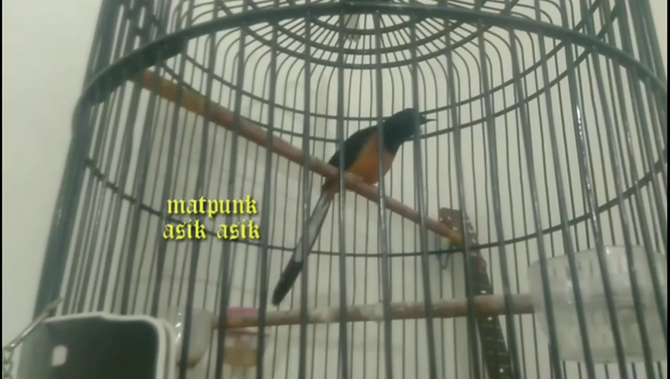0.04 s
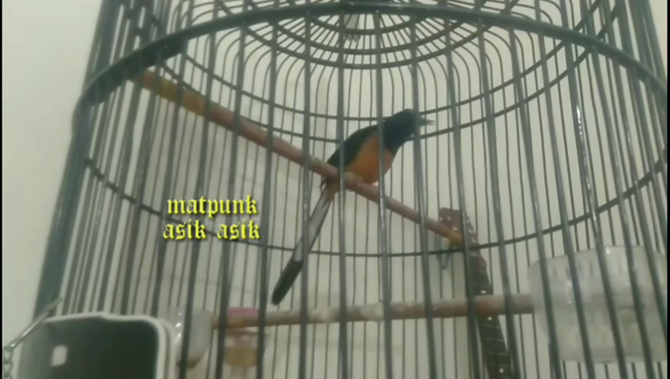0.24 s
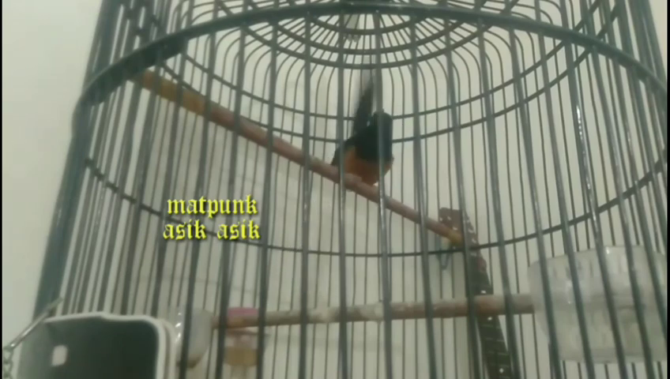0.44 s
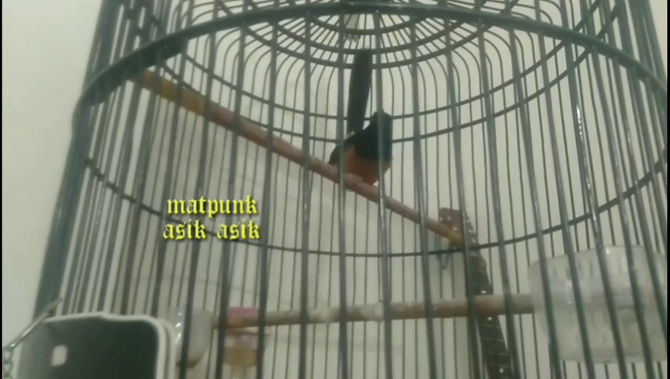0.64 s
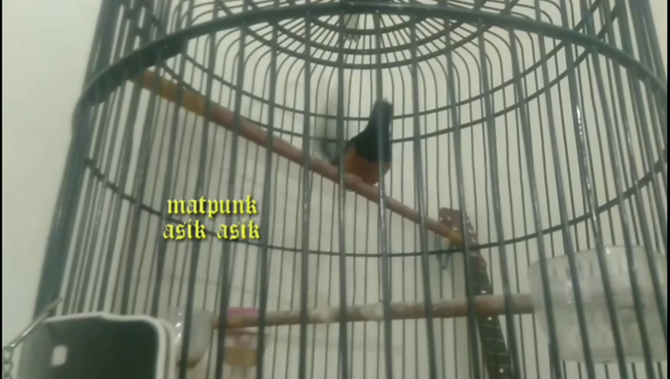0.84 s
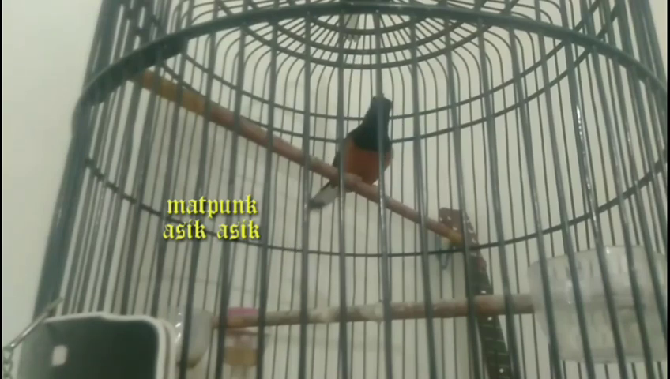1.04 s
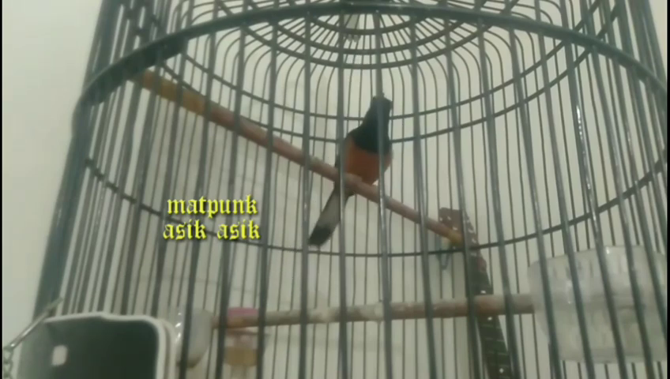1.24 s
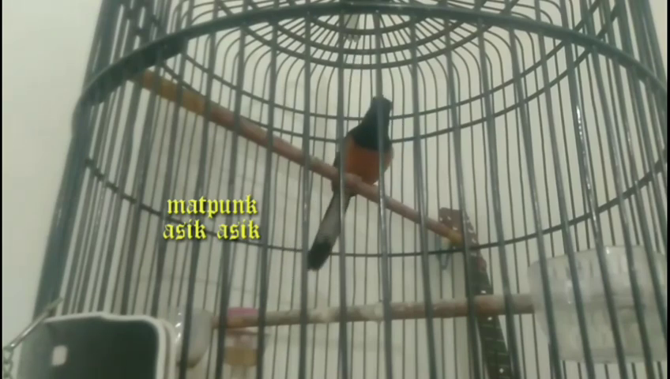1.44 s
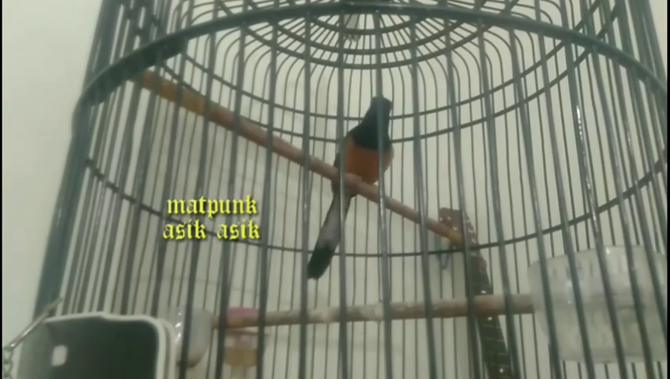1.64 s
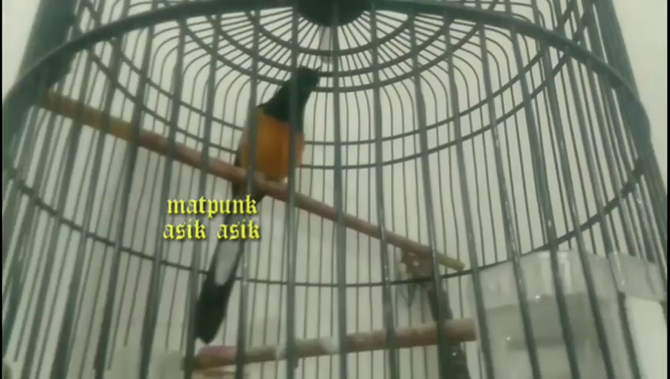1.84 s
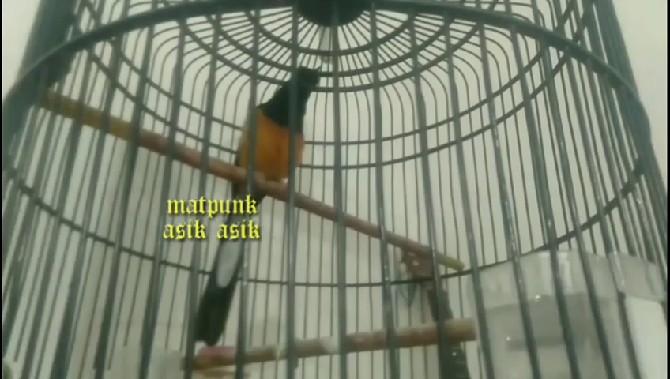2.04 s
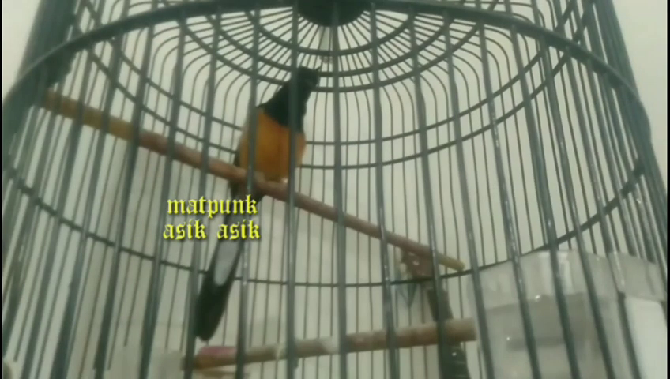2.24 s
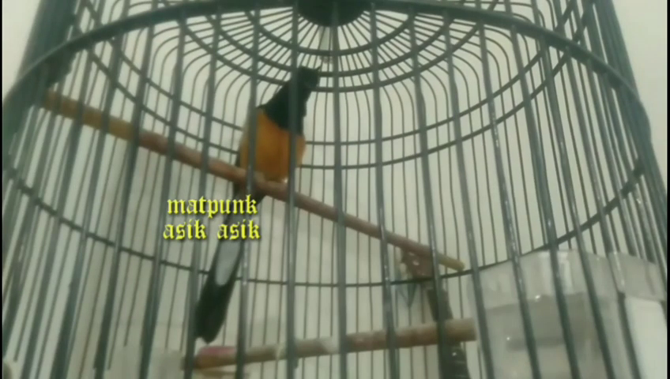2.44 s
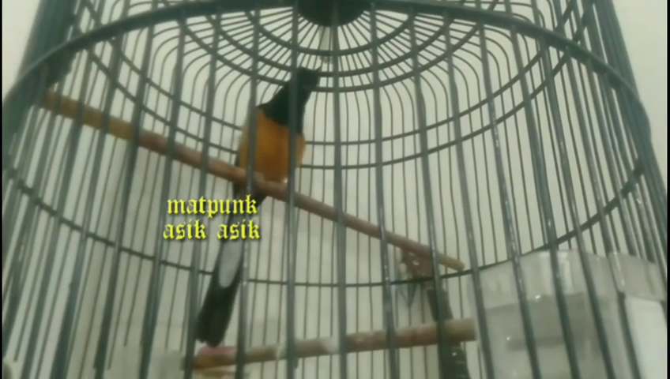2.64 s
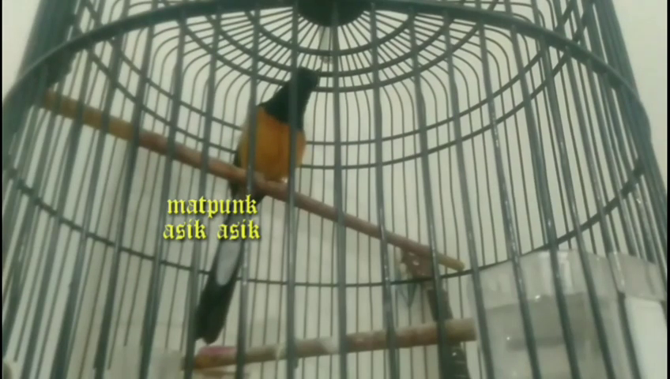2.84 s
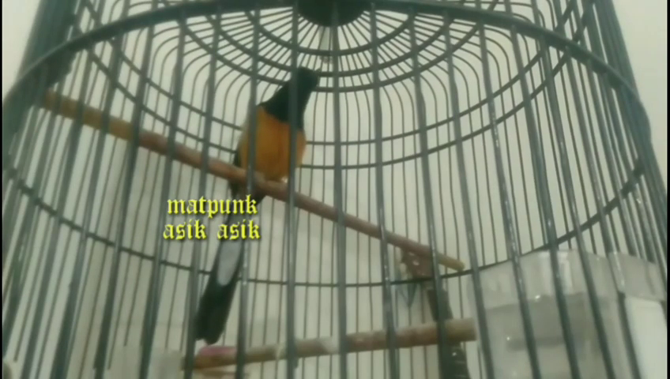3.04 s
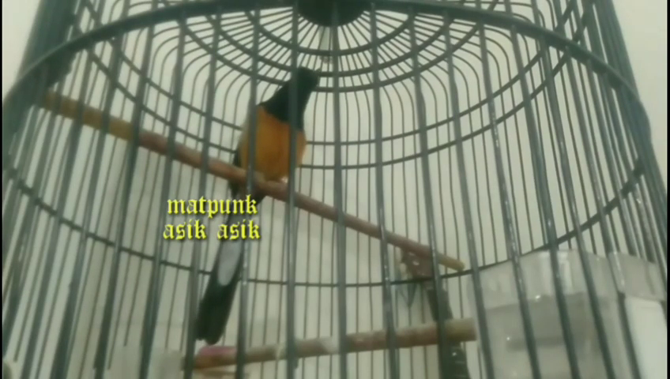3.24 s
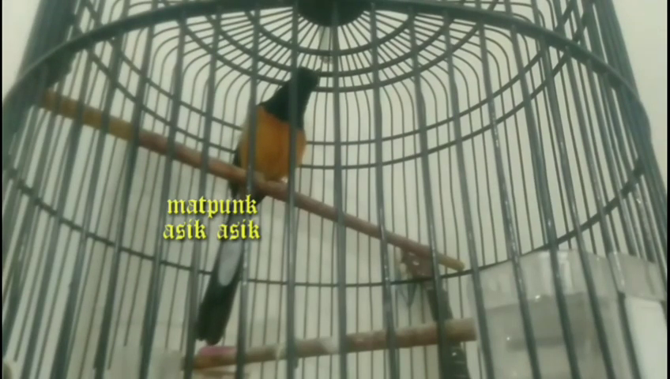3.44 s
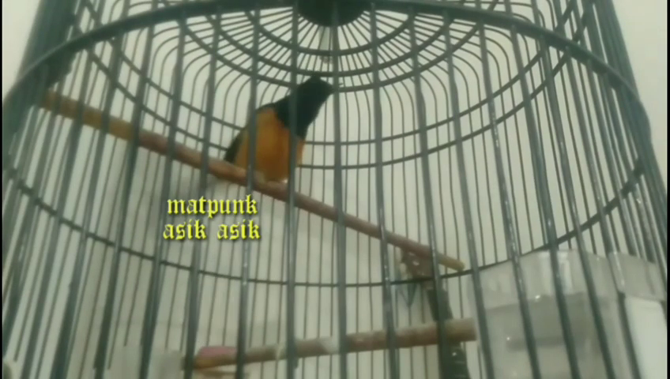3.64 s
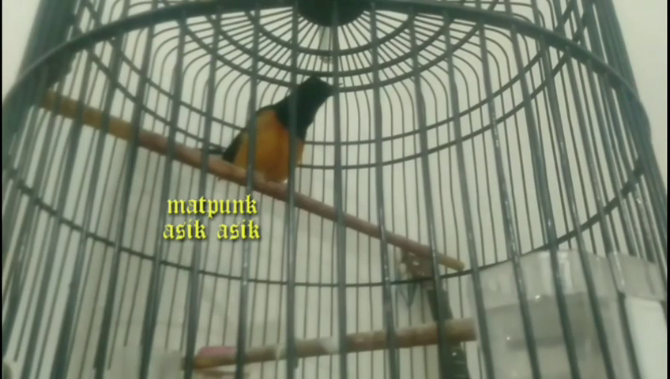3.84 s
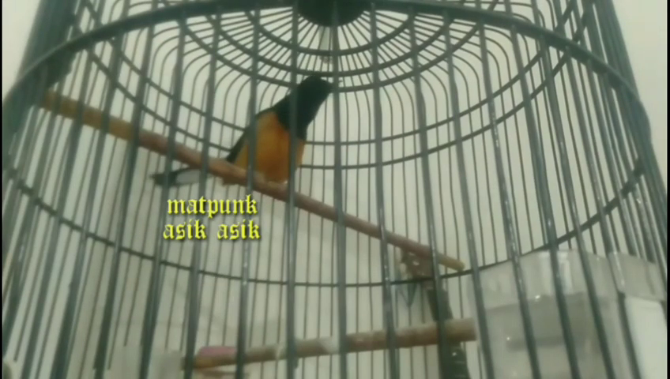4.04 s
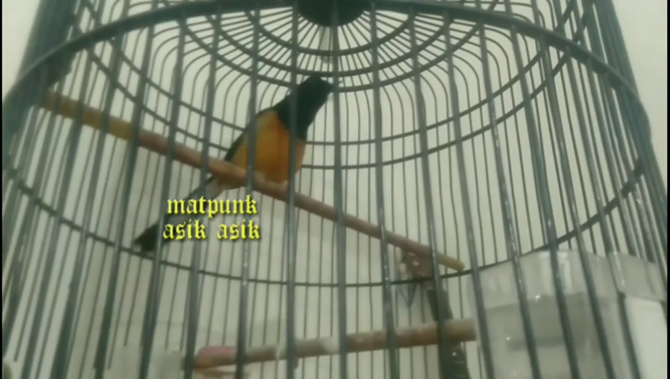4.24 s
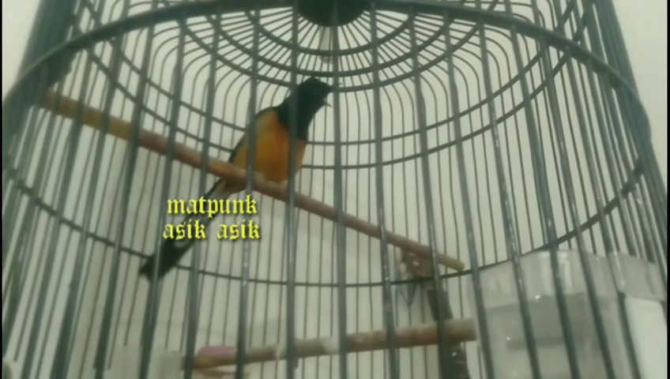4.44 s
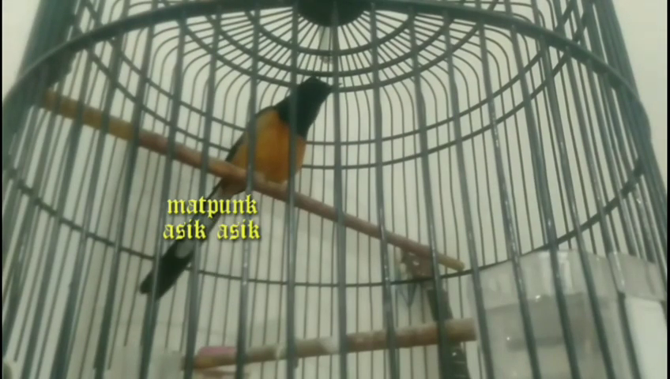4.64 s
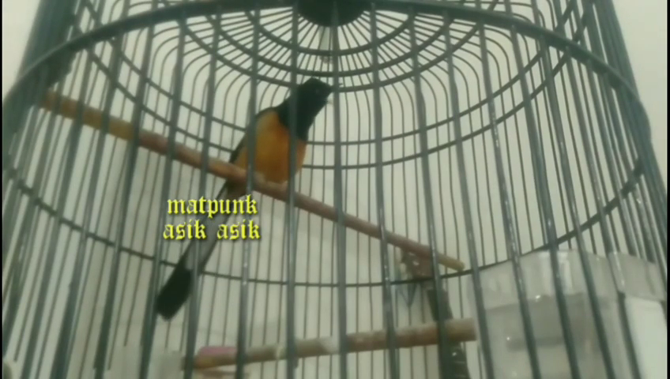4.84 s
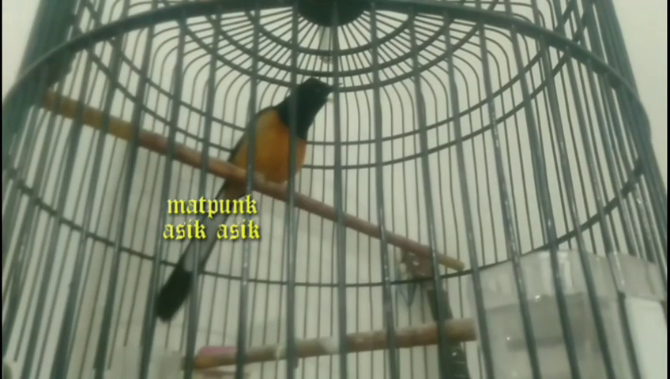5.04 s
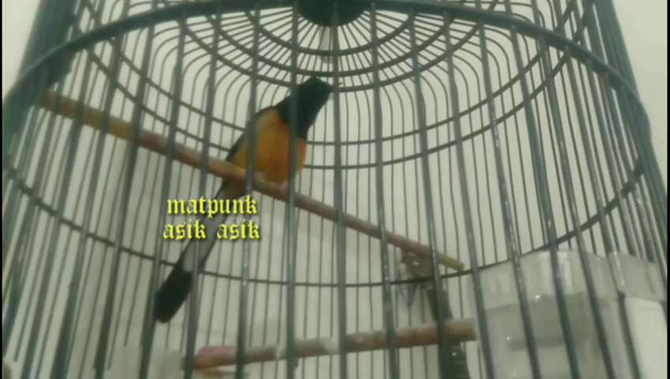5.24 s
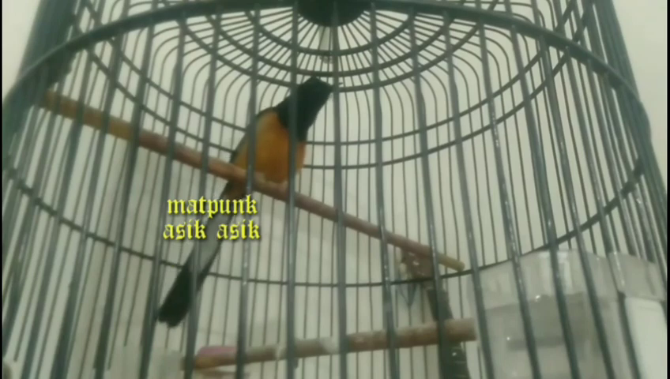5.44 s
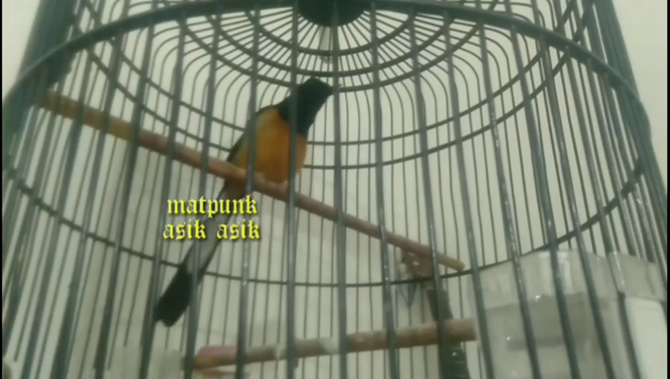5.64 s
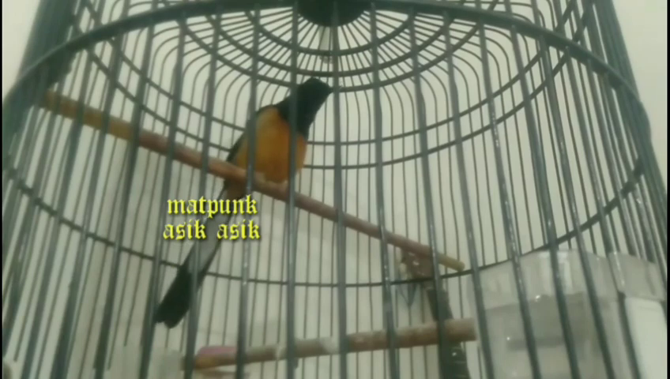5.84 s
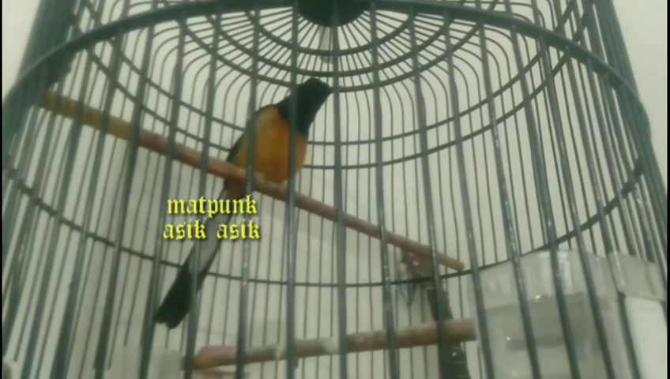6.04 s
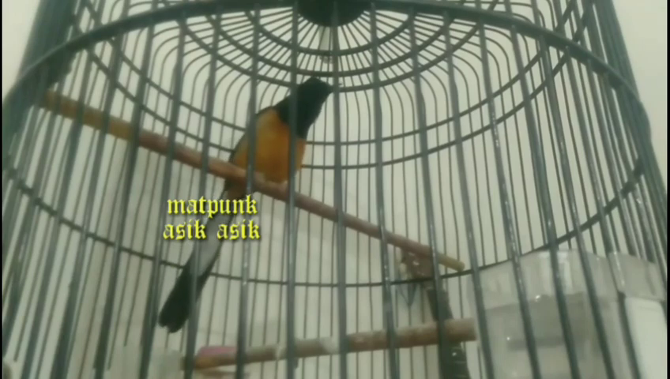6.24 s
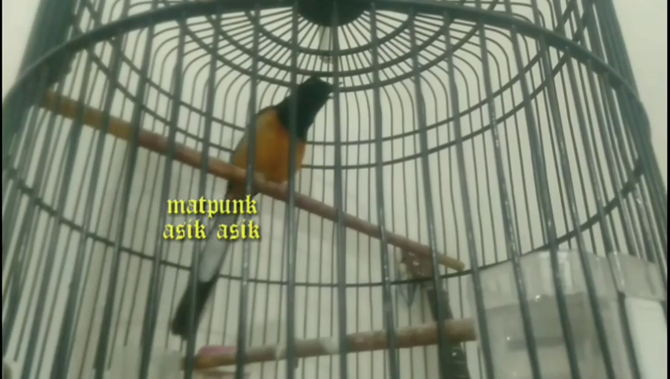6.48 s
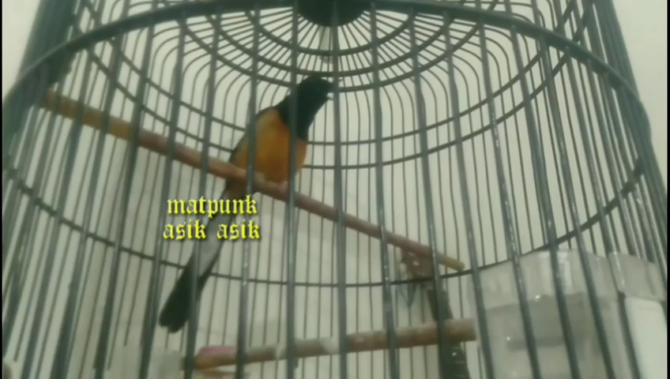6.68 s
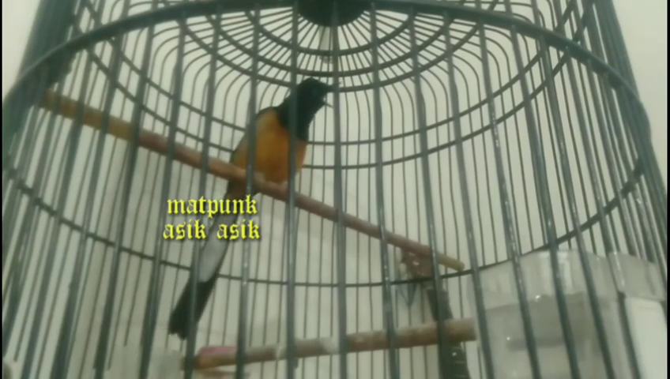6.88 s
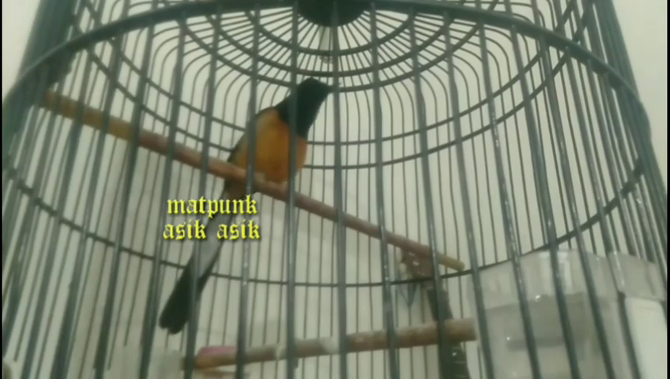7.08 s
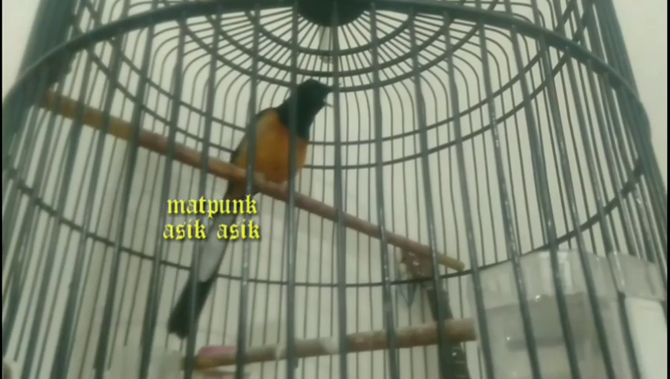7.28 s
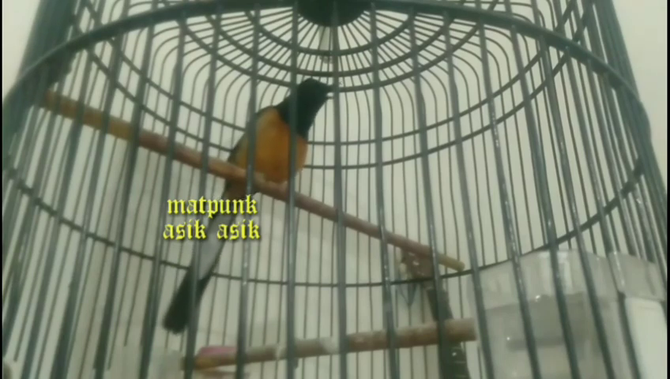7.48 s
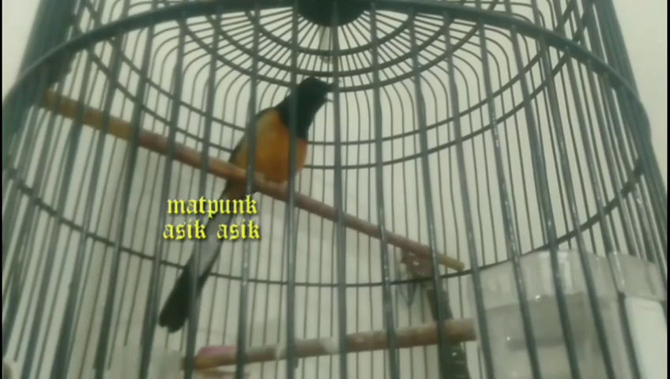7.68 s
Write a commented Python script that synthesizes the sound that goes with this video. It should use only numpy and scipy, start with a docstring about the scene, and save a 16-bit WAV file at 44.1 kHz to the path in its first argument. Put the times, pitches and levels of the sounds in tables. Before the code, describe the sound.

A caged songbird close by sings loud, fast gliding whistles, buzzy rasps, squeaky two-toned slurs and sharp clicking notes in a small echoing room.

```python
"""A caged white-rumped shama in a small hard-walled room, close to the microphone, over hiss, hum and rumble.
It opens with a quiet tone, gliding whistles and rasps of arching pitch, then two taps as it turns on its perch.
From 1 s hoarse glides join; near 1.9 s the level dips briefly, then a low ring and a two-voiced slur sound.
From 2.2 s fast warbled clicks follow, a faint far whine enters at 2.7 s, and whistles, slurs and clicks recur.
Two syrinx sides make the voices; echoes and a dense tail follow; the loudest notes overload the microphone."""
import sys
import numpy as np
from scipy import signal
from scipy.fft import rfft, irfft
from scipy.io import wavfile
from scipy.ndimage import uniform_filter1d

SR = 44100
rng = np.random.default_rng(int(sys.argv[2]) if len(sys.argv) > 2 else 0)


def file_out(sig):
    """Save sig as 16-bit WAV at sys.argv[1]."""
    # one column per channel
    cols = np.atleast_2d(sig).T
    # limit, then scale
    lim = np.clip(cols, -1, 1)
    pcm = np.round(lim * 32767).astype(np.int16)
    wavfile.write(sys.argv[1], SR, pcm)


N = 340011
TIME = np.arange(N) / SR


def undb(db):
    """Decibels to gain."""
    return 10 ** (np.asarray(db) / 20)


def add(out, start, sound):
    """Mix a sound in at a time in seconds."""
    i = max(int(start * SR), 0)
    out[i:i + len(sound)] += sound[:max(N - i, 0)]


def clock(length):
    """Time since the start of a note, at every sample."""
    return TIME[:max(int(length * SR), 256)]


def wander(count, rate_hz):
    """Random drift: straight lines between normal draws of spread 1, rate_hz draws a second."""
    x = np.arange(count) * rate_hz / SR
    return np.interp(x, np.arange(2048), rng.standard_normal(2048))


def noise(count, colour):
    """Noise of rms 1 with a spectrum of (frequency [Hz], level [dB]) points."""
    hz, db = np.transpose(colour)
    f = np.maximum(np.fft.rfftfreq(count, 1 / SR), 1)
    gain = undb(np.interp(np.log(f), np.log(hz), db))
    x = irfft(rfft(rng.standard_normal(count)) * gain, count)
    return x / x.std()


# Spectrum of the room hiss: (frequency [Hz], relative level [dB])
HISS_COLOUR = [(120, -31), (200, -4.5), (339, -8), (385, -7), (479, -7.5), (641, -6), (974, -11),
               (1300, -11.5), (2170, -16), (7090, -23), (15500, -21)]
# Spectrum of the distant rumble: (frequency [Hz], relative level [dB])
RUMBLE_SPECTRUM = [(15, -24.5), (30, -8.5), (55, 1), (100, -8.5), (170, -13.5), (300, -27.5), (1000, -64.5)]
# Rise and fall of the distant rumble: (time [s], level [dB rms])
RUMBLE_LEVEL = [(0.0, -44), (0.06, -47.5), (0.9, -38), (1.07, -45), (3.73, -46), (3.99, -61), (5.17, -43),
                (5.6, -50.5), (7.7, -43)]
# Low hum: (frequency [Hz], level before the hum trim [dB rms])
HUM_TONES = [(53.8, -52.5)]
HISS_DB = -50.5


def background(hum_trim_db=-5):
    """Faint room hiss, a low hum of drifting level and a rumble that comes and goes."""
    hiss = noise(N, HISS_COLOUR) * undb(HISS_DB + 0.72 * wander(N, 4.5))
    rumble = noise(N, RUMBLE_SPECTRUM) * undb(np.interp(TIME, *np.transpose(RUMBLE_LEVEL)))
    out = hiss + rumble
    for hz, db in HUM_TONES:
        level = db + hum_trim_db + 2 * wander(N, 1.2)
        out += np.sqrt(2) * undb(level) * np.sin(2 * np.pi * hz * TIME)
    return out


def labium(hz, db, jitter, shimmer_db, flutter_hz):
    """Phase and swing of one vibrating side of the syrinx; pitch and level flutter a little."""
    n = len(hz)
    phase = 2 * np.pi * np.cumsum(hz * (1 + jitter * wander(n, flutter_hz))) / SR
    edge = np.minimum(np.arange(n), np.arange(n)[::-1]) / (0.00093 * SR)  # short fades against clicks
    return phase, undb(db + shimmer_db * wander(n, flutter_hz)) * np.minimum(edge, 1)


def faint_tones(notes, jitter, shimmer_db, flutter_hz, edge_db):
    """Plain wavering glides that swell to their middle and fade again."""
    out = np.zeros(N)
    for s, length, from_hz, to_hz, db in notes:
        along = np.linspace(-1, 1, len(clock(length)))
        hz = np.linspace(from_hz, to_hz, len(along))
        phase, swing = labium(hz, db + edge_db * along ** 2, jitter, shimmer_db, flutter_hz)
        add(out, s, swing * np.sin(phase))
    return out


# Quiet tones and lingering rings between phrases:
# (start [s], length [s], from [Hz], to [Hz], level at the middle [dB])
QUIET_TONES = [(0, 0.032, 2147, 2180, -33.5), (1.45, 0.19, 2476, 2437, -31), (1.61, .12, 2412, 2363, -34),
               (1.775, .11, 3098, 2820, -37), (3.18, 0.081, 4560, 4680, -47.5),
               (6.165, 0.091, 2063, 2196, -45), (6.225, .06, 2390, 2570, -47)]


def quiet_tones():
    """Quiet near-level tones, without overtones or hiss."""
    return faint_tones(QUIET_TONES, jitter=0.006, shimmer_db=4.5, flutter_hz=253, edge_db=-9.5)


SCOOP_S, BEND_S = .033, .02  # time constants of the opening scoop and the closing bend


def glide(t, from_hz, to_hz, scoop, bend):
    """Pitch of a note: a straight glide with a scoop at its start and a bend at its end."""
    line = np.linspace(from_hz, to_hz, len(t))
    return line * (1 - scoop * np.exp(-t / SCOOP_S)) * (1 + bend * np.exp((t - t[-1]) / BEND_S))


# a note swells from ONSET_DB down, and closes by RELEASE_DB in RELEASE_S seconds
ONSET_DB, RELEASE_DB, RELEASE_S = -23, -12.5, 0.011


def envelope(t, attack_s, db, change_db, opening_db=-15, opening_s=0.0021):
    """Level of a note in dB: a soft opening, a swelling attack, a sloping hold and a quick release."""
    attack = ONSET_DB * (1 - np.minimum(t / attack_s, 1) ** 2) + opening_db * np.exp(-t / opening_s)
    release = RELEASE_DB * np.maximum(1 - (t[-1] - t) / RELEASE_S, 0)
    return db + attack + np.interp(t, [attack_s, t[-1]], [0, change_db]) + release


# Colour of the air hissing through the beak: (frequency [Hz], relative level [dB])
AIR_COLOUR = [(500, -35.5), (1500, -5.5), (3500, -4), (6000, -4), (9000, 4.5), (12000, 7), (15500, -27)]


def air(tone, rough, db=-14, opening_hz=4500):
    """Turbulence in the beak follows the hoarseness and the strength of the high, open-beaked notes."""
    high = signal.sosfilt(signal.butter(4, opening_hz, "high", fs=SR, output="sos"), tone)
    strength = uniform_filter1d(np.abs(high), size=48)
    return undb(db) * strength * rough * noise(len(tone), AIR_COLOUR)


# What the beak lets through above the fundamental: (frequency [Hz], relative level [dB])
BEAK_RESPONSE = [(1500, -25.5), (3200, -41.5), (5500, -50), (7500, -43), (10000, -46), (11500, -41.5),
                 (13300, -35.5), (15500, -39.5), (19000, -101)]


def whistle(hz, db, rough, jitter, shimmer_db, flutter_hz, buzz_hz=185, buzz_depth=0.11, scatter=.025,
            throb_hz=48, throb_db=6, bright_db=9, gape_db=9):
    """A nearly pure tone; when hoarse it buzzes, throbs, scatters in pitch and gains overtones and hiss."""
    n, rough = len(hz), np.clip(rough, 0, 1)

    def unsteady_sine(rate):
        """A sine whose rate drifts at random."""
        return np.sin(2 * np.pi * np.cumsum(rate * (1 + .15 * wander(n, rate / 2))) / SR)

    buzz = unsteady_sine(buzz_hz)
    # the slow throb needs time to build up
    throb = unsteady_sine(throb_hz) * np.minimum(np.arange(n) / (0.08 * SR), 1)
    gape = np.clip((hz - 3700) / 700, 0, 1)  # the beak opens wide for the highest notes
    hz = hz * (1 + rough * (buzz_depth * buzz + scatter * wander(n, 1200)))
    level = db + rough * (1.5 * buzz + throb_db * throb)
    phase, swing = labium(hz, level, jitter, shimmer_db, flutter_hz)
    overtones = np.zeros(n)
    for k in range(2, 6):
        passed = undb(np.interp(k * hz, *np.transpose(BEAK_RESPONSE)))
        overtones += passed * np.sin(k * phase) * 2 / k
    overtone_gain = undb(4.0 + bright_db * rough + gape_db * gape)
    tone = swing * (np.sin(phase) + overtone_gain * overtones)
    return tone + air(tone, rough)


# Gliding notes; the rasp upsweeps pair two overlapping voices:
# (start [s], length [s], glide from [Hz], glide to [Hz], scoop [share of pitch],
# bend [share of pitch], attack [s], level [dB], change after the attack [dB], roughness [0-1])
WHISTLE_NOTES = [ (.04, .065, 3700, 5930, 0, -0.12, .023, 2, -21, 0.2),
                 (0.053, .064, 2350, 3833, 0.0032, -0.37, 0.04, -1.5, -8.5, 0.45),
                 (1.255, 0.06, 3755, 6047, 0.0058, -0.15, .019, -5, -8, 0.2),
                 (1.276, .057, 2730, 4670, 0.017, -0.51, 0.0092, -11.5, 4.5, 0.54),
                 (3.683, 0.11, 992, 1279, 0, -0.34, 0.017, -12.5, 0, .15),
                 (3.824, .192, 2008, 2297, 0.3, -0.08, .024, 4, -13.5, 0),
                 (4.08, 0.15, 1451, 1535, 0.0017, 0.27, 0.074, 4, -4, .12),
                 (4.235, .084, 2314, 2495, .05, -.04, 0.0065, -1, 2, 0.07),
                 (4.736, 0.11, 1785, 1062, 0.14, -0.039, 0.023, -8.5, -1.5, 0),
                 (6.289, 0.26, 1034, 1390, 0.015, 0.52, 0.16, 1.5, 0.5, .14),
                 (6.545, 0.095, 2465, 2472, 0.094, -0.012, 0.0094, 1.5, -2.5, 0.19),
                 (7.154, .092, 1840, 1047, 0.2, -.12, .026, -5.5, -8, 0)]
PULSE_HZ = 44.3  # rate of the pulses in slow swells and in hoarseness


def whistles(stutter_db=9, slow_attack_s=0.065):
    """Rising scoops, short falls, paired rasp upsweeps, and slow swells that break into pulses."""
    out = np.zeros(N)
    for s, length, from_hz, to_hz, scoop, bend, attack_s, db, change_db, rough in WHISTLE_NOTES:
        t = clock(length)
        hz = glide(t, from_hz, to_hz, scoop, bend)
        level = envelope(t, attack_s, db, change_db)
        gaps = np.sin(np.pi * PULSE_HZ * np.maximum(t - attack_s - 1 / PULSE_HZ, 0)) ** 2
        level = level - stutter_db * min(attack_s / slow_attack_s, 1) ** 2 * gaps
        add(out, s, whistle(hz, level, rough, jitter=.004, shimmer_db=2.64, flutter_hz=297.4))
    return out


def contour(rows):
    """Each column of a note at every sample, corners rounded by the inertia of the muscles."""
    s, *columns = np.transpose(rows)
    s = np.sort(s)
    t = s[0] + np.arange(max(int((s[-1] - s[0]) * SR), 256)) / SR
    return [uniform_filter1d(np.interp(t, s, c), size=90, mode="nearest") for c in columns]


# Rasp strokes, each a quick arch of pitch:
# (time of the crest [s], length [s], foot [Hz], crest [Hz], level on the falling flank [dB])
RASP_STROKES = [(0.122, 0.034, 2400, 5400, 1.5), (0.161, 0.027, 2502, 5860, 2),
                (0.193, 0.036, 2366, 5885, -2), (1.347, 0.022, 2775, 5190, -1.5),
                (1.379, 0.034, 2820, 5770, -3.5), (1.412, 0.039, 2772, 5744, -2)]


def rasps(lower_ratio=.55, lower_db=-15, foot_db=-24, crest_db=-10, rough=0.94):
    """Each stroke throws the pitch up and down, loudest on its flanks; the other side follows roughly, lower."""
    out = np.zeros(N)
    for s, length, foot, crest, db in RASP_STROKES:
        flank = (foot + crest) / 2
        times = s + length * np.linspace(-.5, .5, num=5)
        pitches = [foot, flank, crest, flank, foot]
        levels = db + np.array([foot_db, -2, crest_db, 0, foot_db])
        hz, level = contour(np.column_stack([times, pitches, levels]))
        upper = whistle(hz, level, rough, jitter=0.0032, shimmer_db=0.5, flutter_hz=1006.6,
                        buzz_depth=0.011, scatter=0.0073, gape_db=5.5)
        lower = whistle(lower_ratio * hz, level + lower_db, rough,
                        jitter=.04, shimmer_db=8.5, flutter_hz=990)
        add(out, times[0], upper + lower)
    return out


# Sharp taps as the bird turns on its perch: (time [s], starting level before the bass cut [dB])
PERCH_TAPS = [(0.514, -11.5), (.524, -15.5)]
# Spectrum of a tap: (frequency [Hz], relative level [dB])
TAP_SPECTRUM = [(360, -53), (620, -12.5), (963, -4.5), (2650, -5), (2910, -1), (3700, -12.5), (5520, -8.5),
                (6560, -39), (12600, -26.5), (15000, -26)]


def taps(decay_s=0.0037, lowest_hz=620):
    """Short dry cracks of decaying noise; the light perch and wires give little bass."""
    out, t = np.zeros(N), TIME[:2048]
    for s, db in PERCH_TAPS:
        add(out, s, undb(db) * np.exp(-t / decay_s) * noise(len(t), TAP_SPECTRUM))
    return signal.sosfilt(signal.butter(5, lowest_hz, "high", fs=SR, output="sos"), out)


# Notes that start hoarse, with a lower side tone from the other half of the syrinx:
# (start [s], length [s], glide from [Hz], glide to [Hz], scoop [share of pitch], bend [share of pitch],
# attack [s], level [dB], change after the attack [dB], roughness [0-1], hoarse for [s],
# side tone pitch [ratio], side tone level [dB])
HOARSE_GLIDES = [ (0.972, .121, 1859, 2899, .19, -.27, .018, 0.5, -1.5, .9, .06, .67, -24.5),
                 (2.564, 0.29, 2344, 4026, -0.1, -0.047, 0.043, -4.5, 1, 0.79, 0.13, 0.67, -12.5),
                 (4.396, 0.059, 2107, 2592, 0.07, 0, 0.0053, -15.5, 15.5, 0.37, 0.12, .51, -25),
                 (4.454, 0.24, 2966, 3924, 0.052, 0, 0.0077, 0, -3, 0.48, 0.075, .52, -19.5),
                 (5.414, 0.061, 2741, 2543, 0.29, -0.011, 0.014, -2, -3, 0.42, 0.093, 0.55, -23.5),
                 (5.468, 0.17, 2820, 3079, 0.043, -0.29, 0.0052, -1, -2.5, 0.58, 0.14, 0.61, -16),
                 (5.634, 0.088, 2116, 2143, -0.088, 0.0019, 0.0068, -2.5, -20, 0.41, 0.17, .585, -16),
                 (6.759, 0.089, 2373, 2526, 0.28, -0.009, 0.015, 1, -2.5, 0.54, 0.15, 0.55, -22.5),
                 (6.834, 0.19, 2731, 3480, 0.065, 0, 0.0057, -4.5, 3.5, 0.69, 0.13, 0.66, -12),
                 (7.007, 0.085, 3416, 4357, 0, -0.11, 0.0047, -2, 1.5, 0.25, 0.018, 0.74, -28)]
CLEARING_S, FIRST_PULSE_S = 0.024, 0.009  # time a hoarse note takes to clear; peak of its first pulse


def hoarse_notes(clear_rough=0.11, side_attack_s=.011, side_octave_db=-10, pulse_depth=.55, side_follow=.6):
    """Glides stay rough while the other syrinx side pulses on a lower tone; the longer ones clear as it stops."""
    out = np.zeros(N)
    for (s, length, from_hz, to_hz, scoop, bend, attack_s, db, change_db,
         rough, hoarse_s, ratio, side_db) in HOARSE_GLIDES:
        t = clock(length)
        hz = glide(t, from_hz, to_hz, scoop, bend)
        level = envelope(t, attack_s, db, change_db)
        pulse = 1 + pulse_depth * np.cos(2 * np.pi * PULSE_HZ * (t - FIRST_PULSE_S))
        hoarse = pulse * (1 - np.tanh((t - hoarse_s) / CLEARING_S)) / 2
        main_rough = clear_rough + (rough - clear_rough) * hoarse
        main = whistle(hz, level, main_rough, jitter=0.0054, shimmer_db=2.93, flutter_hz=300,
                       buzz_depth=0.052, scatter=.02, throb_db=6, bright_db=10.5)
        side_level = envelope(t, side_attack_s, side_db, 0)
        centre = np.average(hz, weights=np.abs(hoarse))
        side_hz = ratio * centre * (hz / centre) ** side_follow  # follows the glide only in part
        side = whistle(side_hz, side_level, rough, jitter=.016, shimmer_db=3.5, flutter_hz=394,
                       scatter=.02, throb_db=3)
        octave = whistle(2 * side_hz, side_level + side_octave_db, rough, jitter=.008, shimmer_db=7.5,
                         flutter_hz=409, buzz_depth=.02, scatter=.01)
        add(out, s, main + hoarse * (side + octave))
    return out


def low_ring(start=1.945, swell_s=0.021, decay_s=0.11, db=-23):
    """A low, hollow ring of band-shaped noise swells and fades under the first slur."""
    t = np.maximum(TIME - start, 0)
    # (frequency [Hz], relative level [dB])
    colour = [(500, -55.5), (850, -20.5), (1100, -4.0), (1400, -9.5), (1800, -17.0), (3000, -56.5)]
    return undb(db) * np.minimum(t / swell_s, 1) ** 2 * np.exp(-t / decay_s) * noise(N, colour)


# the high voice sags slowly from its starting pitch, then dives
SLUR_HIGH_HZ, SLUR_SAG_HZ, SLUR_FALL_HZ, SLUR_HIGH_DB = 7120, 406, 1550, -17


def slur_voices(length, from_hz, to_hz, bend, db, peak_s, fall_s, attack_s=0.0077, push_db=14,
                push_s=0.026, fall_power=5.2, fade_db=-20, scoop=0.029, scoop_s=0.016):
    """The low voice sinks and ends in a loud push; the high voice holds, then dives and fades."""
    t = clock(length)
    low_hz = glide(t, from_hz, to_hz, 0, bend)
    low_db = envelope(t, attack_s, db, 0) + push_db * np.exp(-((t - peak_s) / push_s) ** 2)
    fall = (t / fall_s) ** fall_power
    high_hz = SLUR_HIGH_HZ - SLUR_SAG_HZ * t / fall_s - SLUR_FALL_HZ * np.minimum(fall, 1.2)
    high_hz = high_hz * (1 - scoop * np.exp(-t / scoop_s))
    high_db = envelope(t, 2.34 * attack_s, SLUR_HIGH_DB, 0) + fade_db * fall
    return low_hz, low_db, high_hz, high_db


# Two-voiced falling slurs: (start [s], length [s], low voice from [Hz], to [Hz], bend [share of pitch],
# low voice level before its push [dB], push peaks after [s], high voice falls over [s])
SLUR_NOTES = [(1.972, .188, 4289, 3766, 0.001, -10.5, .162, 0.18),
              (4.897, 0.15, 4344, 3403, -0.035, -12.5, 0.13, 0.12),
              (7.303, .183, 4416, 3867, -0.41, -11, 0.146, .165)]


def slurs(low_octave_db=-10, high_octave_db=2, sum_db=-16, difference_db=-24, between_db=-16, rough=0.74):
    """Two falling tones, beak wide open; the sides couple, giving octaves, sum and difference tones."""
    out = np.zeros(N)
    for s, *gesture in SLUR_NOTES:
        low_hz, low_db, high_hz, high_db = slur_voices(*gesture)
        a, low = labium(low_hz, low_db, jitter=0.0061, shimmer_db=3.5, flutter_hz=294.8)
        b, high = labium(high_hz, high_db, jitter=0.003, shimmer_db=1.2, flutter_hz=307)
        low_octave = undb(low_octave_db) * np.minimum(low, .25) * np.sin(2 * a)
        high_octave = undb(high_octave_db) * high * np.sin(2 * b)
        mixed = undb(sum_db) * (np.sin(a + b) + np.sin(2 * a + b))
        mixed += undb(difference_db) * np.sin(b - a) + undb(between_db) * np.sin(3 * a - b)
        tone = low * np.sin(a) + high * (np.sin(b) + mixed) + low_octave + high_octave
        add(out, s, tone + air(tone, np.linspace(0, rough, len(tone))))  # hissier as the note goes on
    return out


# Clicking notes, some falling, most rising: (start [s], length [s], from [Hz], to [Hz], level [dB])
CLICK_NOTES = [(2.196, .039, 3752, 2746, -0.5), (2.275, 0.049, 2750, 3015, -7),
               (2.357, 0.053, 2894, 3350, -0.5), (2.451, 0.058, 2802, 3063, -1),
               (5.094, 0.041, 3370, 3276, -2), (5.173, 0.06, 2980, 3276, -1.5),
               (5.276, 0.052, 2840, 3410, -3), (7.552, 0.055, 2760, 3908, -1),
               (7.66, 0.06, 2900, 3730, -6.5)]
# the pitch swing inside every click; depth is a share of pitch
WARBLE_HZ, WARBLE_DEPTH, FIRST_CREST_S, WARBLE_DECAY_S = 76, 0.19, 0.01049, 0.035


def clicks(scoop=.42, droop=0.294, edge_s=.0038, attack_s=0.014, crest_db=-0.5, closing_db=-15, rough=0.051):
    """A warble so fast it is heard as one sharp note: pitch leaps up, swings less and less, and drops."""
    out = np.zeros(N)
    for s, length, from_hz, to_hz, db in CLICK_NOTES:
        t = clock(length)
        swing = np.cos(2 * np.pi * WARBLE_HZ * (t - FIRST_CREST_S))
        opening, closing = np.exp(-t / edge_s), np.exp((t - t[-1]) / edge_s)
        warble = 1 + WARBLE_DEPTH * np.exp(-t / WARBLE_DECAY_S) * swing
        hz = np.linspace(from_hz, to_hz, len(t)) * warble * (1 - scoop * opening - droop * closing)
        onset = ONSET_DB * np.maximum(1 - t / attack_s, 0)
        level = db + crest_db * swing + onset + closing_db * closing  # slightly louder in the troughs
        add(out, s, whistle(hz, level, rough, jitter=0.0045, shimmer_db=4.0, flutter_hz=619.0))
    return out


# A faint whine far away: (start [s], length [s], from [Hz], to [Hz], level at the middle [dB])
WHINE_NOTES = [(2.7, 0.6, 735, 636, -61.5), (3.35, .37, 615, 577, -53), (5.9, .35, 715, 677, -57)]


def far_whine():
    """Faint low tones that sink and waver in pitch and level."""
    return faint_tones(WHINE_NOTES, jitter=0.03, shimmer_db=6.5, flutter_hz=90, edge_db=-7)


# Near reflections: (delay [s], level [dB])
NEAR_ECHOES = [(.0031, -19), (.0074, -12.5), (0.0131, -7), (0.0206, -11.5), (.033, -12)]
# Ring of the room: (frequency [Hz], time to fall 60 dB [s], relative level [dB])
ROOM_RING = [(696, 0.6, -3), (1500, 0.57, -5.5), (3240, 0.49, -1.5), (5360, 0.46, -11), (8200, 0.57, -7.5),
             (14000, 0.6, -1)]


def room(x, build_s=0.0048):
    """Direct sound, a few near reflections, then a dense noise tail whose decay time varies with pitch."""
    t = TIME[:SR]
    hz, t60, db = np.transpose(ROOM_RING)
    f, white = np.fft.rfftfreq(SR, 1 / SR), rfft(rng.standard_normal(SR))
    response = np.zeros(SR)
    for share, ring, gain in zip(np.eye(len(hz)), t60, undb(db)):
        fade = np.minimum(t / build_s, 1) * np.exp(-np.log(1000) * t / ring)
        band = irfft(white * np.interp(f, hz, share), SR)  # overlapping triangular bands
        response += gain * band * fade / np.linalg.norm(fade)
    response[0] += 1
    for delay, echo_db in NEAR_ECHOES:
        response[int(delay * SR)] += undb(echo_db)
    return signal.fftconvolve(x, response)[:N]


# The level dips briefly; its first and last values hold before and after: (time [s], level [dB])
LEVEL_DIP = [(1.87, -5), (1.90, -16), (1.925, -35), (1.945, -6)]


def scene():
    """The bird in its room, over a faint rumble and hiss."""
    voice = quiet_tones() + whistles() + rasps() + hoarse_notes() + slurs() + clicks()
    sound = background() + undb(1.5) * room(voice + taps()) + low_ring() + far_whine()
    return (sound * undb(np.interp(TIME, *np.transpose(LEVEL_DIP))))[None]


TOP_HZ = 15500


def record(dry, ceiling=0.71, knee=9):
    """The microphone flattens the loudest waves, which adds odd overtones; the top is cut."""
    x = signal.resample_poly(dry, 2, 1, axis=-1)  # twice the rate, against aliasing
    x = x / (1 + np.abs(x / ceiling) ** knee) ** (1 / knee)
    x = signal.resample_poly(x, 1, 2, axis=-1)
    return signal.sosfilt(signal.ellip(10, .1, 80, TOP_HZ, fs=SR, output="sos"), x)


dry = scene()
out = record(dry)
file_out(out)
```